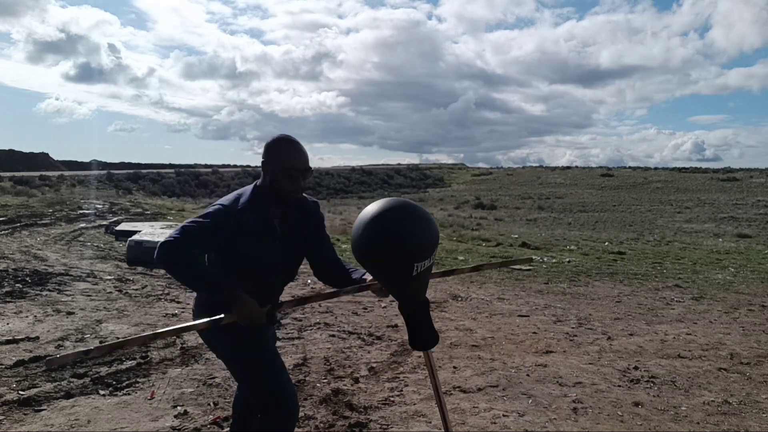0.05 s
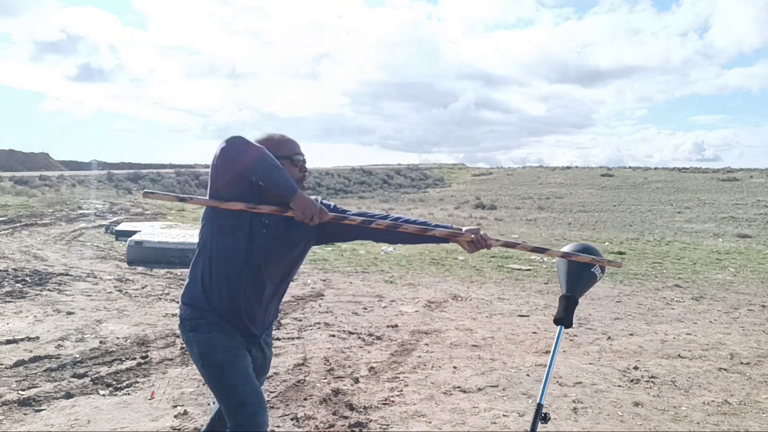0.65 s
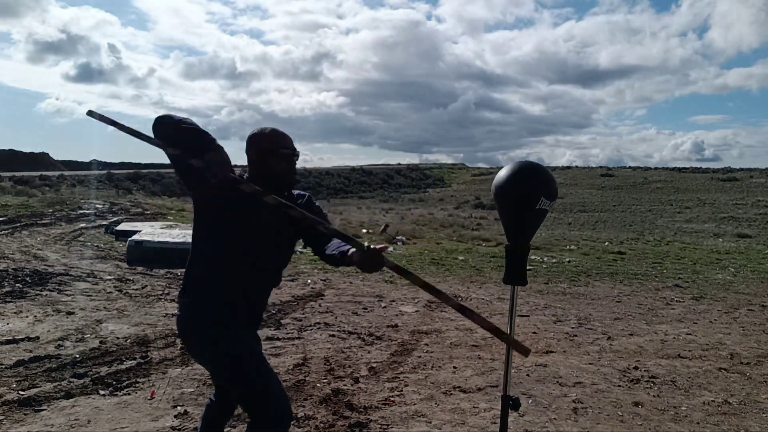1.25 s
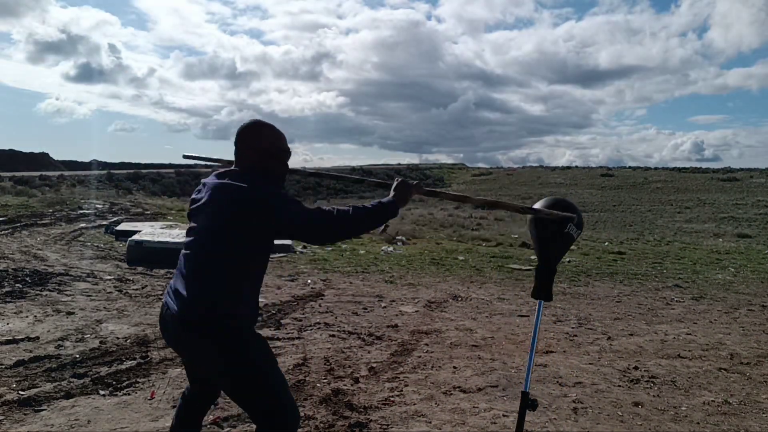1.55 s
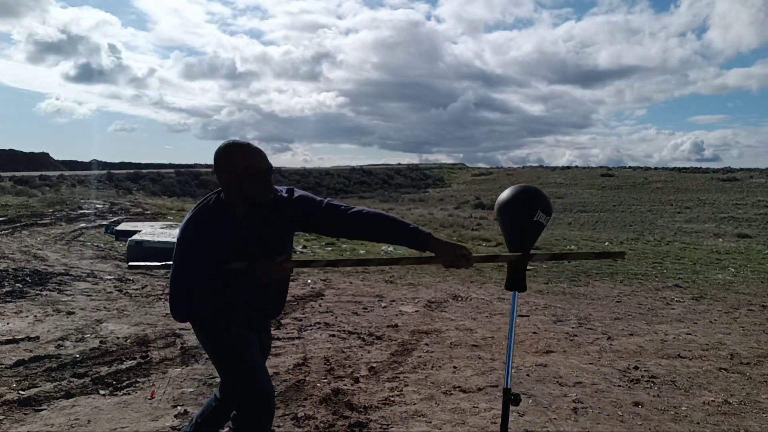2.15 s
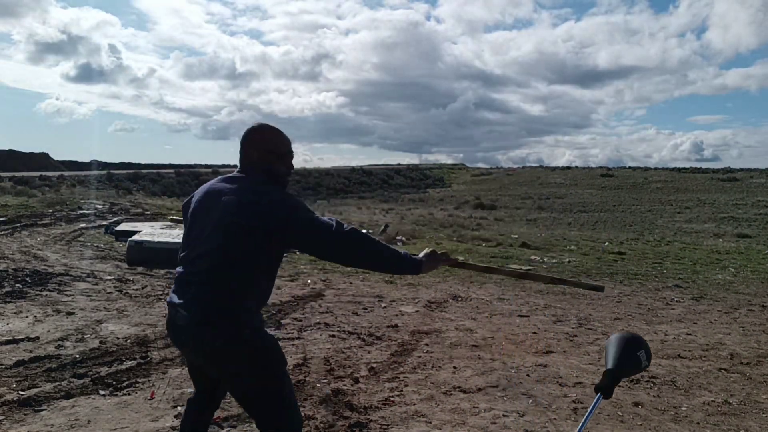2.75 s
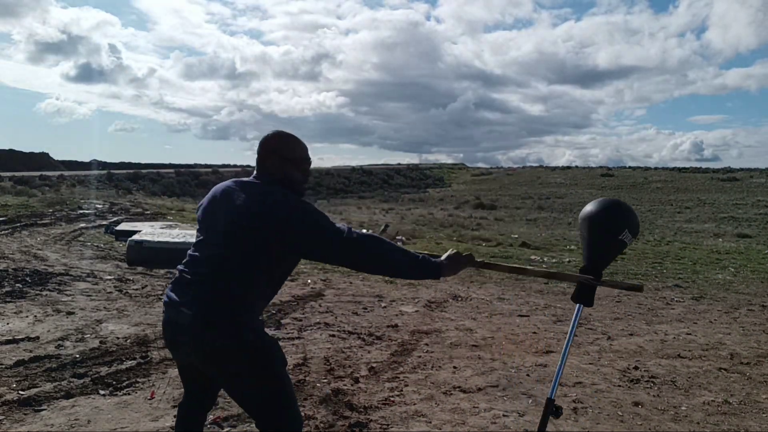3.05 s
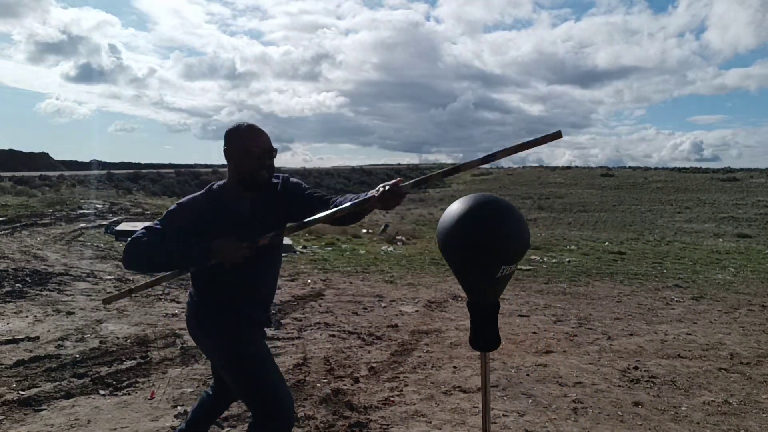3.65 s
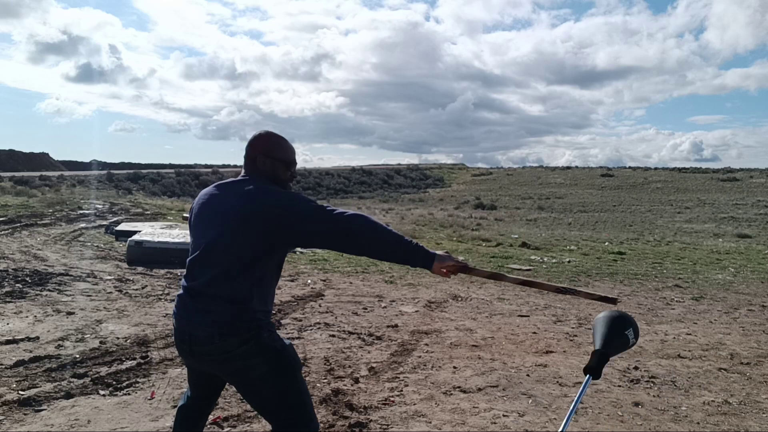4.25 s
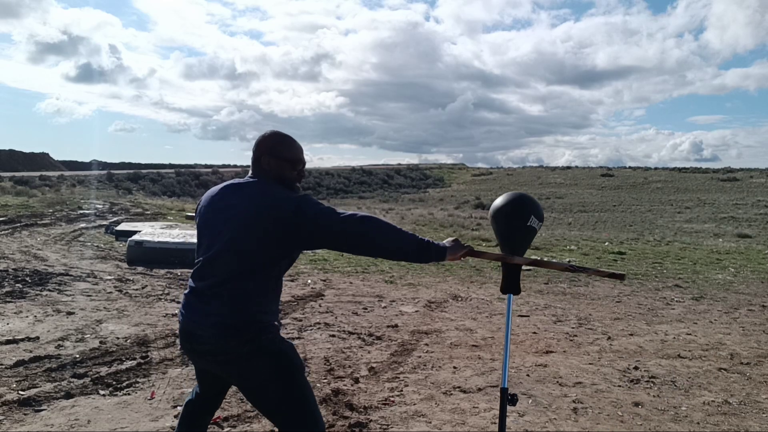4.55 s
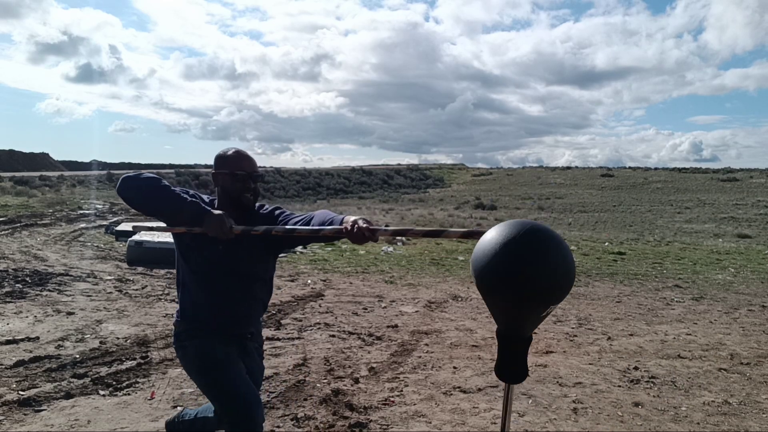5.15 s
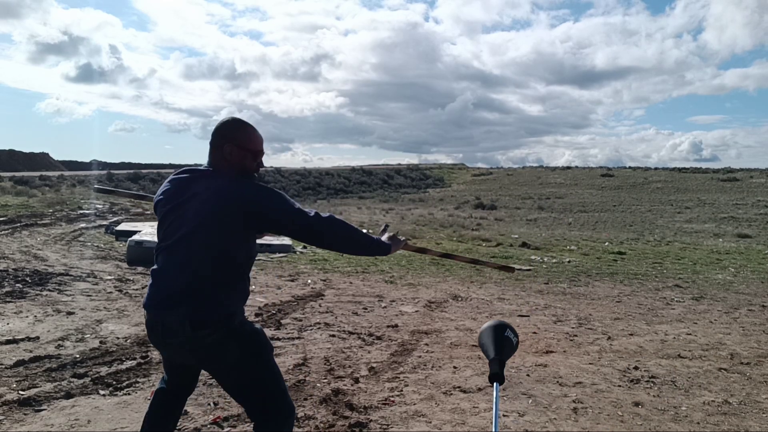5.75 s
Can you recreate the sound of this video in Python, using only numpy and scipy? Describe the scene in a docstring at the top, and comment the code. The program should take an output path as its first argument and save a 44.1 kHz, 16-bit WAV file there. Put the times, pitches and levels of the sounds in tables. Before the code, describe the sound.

Wind buffets the microphone in an open field as someone strikes a free-standing punching ball with a wooden stick. Two hard cracks on the pole come near the start, among quick, irregular slaps that continue to the end. Each blow shakes the stand into a hollow rattle, and its spring sometimes creaks. Faint clothing swishes and scuffs on dirt fill the gaps, with almost no echo.

```python
"""A wooden stick strikes a punching ball on a sprung steel pole in an open field.
It slaps the ball or cracks on the pole; the stand rattles, booms and rings, and its spring creaks.
Sleeves swish and shoes scuff with each move, and wind buffets the two microphone ports."""
import sys
import numpy as np
from scipy import signal
from scipy.fft import rfft, irfft, next_fast_len
from scipy.io import wavfile
from scipy.ndimage import uniform_filter1d

SR = 44100
rng = np.random.default_rng(int(sys.argv[2]) if len(sys.argv) > 2 else 0)


def persist_wave(psi):
    """Save psi, clipped to +-1, as 16-bit WAV."""
    counts = np.round(np.clip(psi, -1, 1) * 32767).astype(np.int16)
    wavfile.write(sys.argv[1], SR, np.atleast_2d(counts).T)


N = 265041
SPAN = 16384  # samples per event
AGE_S, TIME_S = np.arange(SPAN) / SR, np.arange(N) / SR
USUAL_SLAP_DB, USUAL_RATTLE_DB = -28, -37

# stick on ball: t/s, smack/dB, thump/dB
SLAP_HITS = [(.611, -31.5, -28), (1.422, -32.5, -44.5), (1.8446, -26.5, -30.5), (2.421, -26.5, -28),
             (2.935, -37, -29.5), (3.3308, -24.5, -22.5), (3.7768, -26.5, -19), (4.8566, -23.5, -28),
             (5.5589, -26, -23), (5.9823, -31.5, -32.5)]
# stand joints: t/s, chatter/dB, rise/s, t60/s, tilt/(dB/oct), boom/dB, boom f/Hz
STAND_JOLTS = [(.611, -45.5, 0.021, 0.094, 2, -36.5, 218.5),
               (0.6948, -39.5, 0.00064, 0.099, 0.5, -36.5, 310),
               (0.787, -42.5, 0.0017, 0.14, 4.5, -42, 295), (1.254, -48, 0.0022, 0.41, -9, -43, 262),
               (1.418, -35, 0.029, 0.19, 2.5, -27, 272.2), (1.4979, -36, 0.0013, 0.073, 4, -37, 238),
               (1.724, -50, 0.0017, 0.027, -11, -50.5, 544), (1.848, -44.5, 0.0027, 0.091, 8, -48, 211),
               (2.004, -40.5, 0.0032, .16, 3, -37, 355.4), (2.422, -27.5, 0.013, .16, 4, -20.5, 245.1),
               (2.92, -41, 0.013, 0.084, 4.5, -32.5, 343.7), (3.321, -34.5, 0.013, 0.17, 3.5, -25, 264.3),
               (3.78, -28, 0.002, 0.11, 5, -32.5, 253), (3.868, -43, 0.0049, 0.13, 3.5, -57, 250),
               (4.367, -26, 0.012, .062, 5, -28.5, 269.2), (4.473, -43, 0.0039, 0.11, 1.5, -41, 328),
               (4.858, -34.5, 0.0096, 0.13, 3.5, -35, 261.8), (5.386, -53, 0.0025, 0.017, 6, -52, 914),
               (5.565, -34, 0.0021, 0.021, 5, -55, 393), (5.986, -37, 0.0014, 0.064, 3, -66, 264)]
# scuff and grit spectrum: f/Hz, level/dB
SCUFF_SPECTRUM = [(150, 15), (450, 3.5), (1200, -1.5), (2500, -3.5), (4200, -4.5), (6200, 0), (8000, -6.5),
                  (10300, -2.5), (12500, -14.5), (16000, -24.5)]


def ball_slaps():
    """The skin smacks; the dented ball gives one heavily damped push of air."""
    # smack spectrum: f/Hz, level/dB
    spectrum = [(150, 10.5), (600, 12), (1300, -2), (2500, -5), (4300, 0), (6000, -4), (10000, 0),
                (12500, -6), (16000, -21)]
    out = np.zeros((2, N))
    push = -np.sin(2 * np.pi * 235 * AGE_S) * envelope(0.0012, 0.0088)
    push -= 0.47 * np.sin(2 * np.pi * 260 * AGE_S) * envelope(0.00424, 0.0068)
    for t_s, smack_db, thump_db in SLAP_HITS:
        smack = burst(spectrum, tilt_db_oct=-0.8, rise_s=0.00071, t60_s=0.0217, grain_db=5)
        add(out, t_s, amp(smack_db) * smack + amp(thump_db) * push)
    return out


def stick_cracks():
    """Wood on steel: a hard crack and a duller bounce; the stick's bending modes ring on."""
    # stick on pole: t/s, crack/dB, wood ring/dB, bounce delay/s, bounce/dB
    hits = [(0.1439, -21, -29, .016, -29.5), (1.2485, -25, -46.5, 0.0038, -35)]
    # stick modes: f/Hz, level/dB, t60/s
    modes = [(640, -17, 0.43), (987, -13, 0.23), (1065, 9, 0.015), (1250, -11, 0.12), (1681, -1.5, 0.077),
             (1778, 1.5, 0.028), (1920, -3, 0.12), (2147, -12, 0.11), (2240, -11, 0.067),
             (2730, -10, 0.014), (2600, -15.5, 0.099), (2930, -7.5, 0.048), (3900, -14.5, 0.057)]
    # crack spectrum: f/Hz, level/dB
    spectrum = [(150, 6.5), (400, 1), (700, 2), (1100, 7), (2600, 8.5), (4200, 0), (5500, 1), (8000, -0.5),
                (11000, -3), (16000, -21.5)]
    out = np.zeros((2, N))
    for t_s, crack_db, wood_db, bounce_s, bounce_db in hits:
        phases = rng.uniform(0, 2 * np.pi, (len(modes), 1, 1))
        phases = phases + 0.7 * rng.standard_normal((len(modes), 2, 1))  # spread between ports
        wood = sum(amp(db) * np.sin(2 * np.pi * hz * AGE_S + phase) * envelope(0.0015, t60_s)
                   for (hz, db, t60_s), phase in zip(modes, phases))
        crack = burst(spectrum, tilt_db_oct=0, rise_s=0.0004, t60_s=0.056, grain_db=4)
        bounce = burst(spectrum, tilt_db_oct=-2, rise_s=0.002, t60_s=0.11, grain_db=2)
        add(out, t_s, amp(crack_db) * crack + amp(wood_db) * wood)
        add(out, t_s + bounce_s, amp(bounce_db) * bounce)
    return out


def stand_rattles():
    """Loose joints chatter in clumps; the hollow stand booms just behind, with one overtone."""
    # chatter spectrum: f/Hz, level/dB
    spectrum = [(120, 2), (300, -4), (560, 23.5), (780, 6), (1200, 11.5), (1700, -2), (3000, -5),
                (4500, -13), (6000, -10), (8000, -17), (10300, -14.5), (12500, -31), (16000, -33.5)]
    out = np.zeros((2, N))
    for t_s, chatter_db, rise_s, t60_s, tilt_db_oct, boom_db, boom_hz in STAND_JOLTS:
        jolts = 0.2 * wander(SPAN, 120)  # chatter jolts the boom's pitch
        phase = 2 * np.pi * np.cumsum(boom_hz * (1 + jolts)) / SR
        boom_rise_s = 0.0036 + 1.7 * rise_s
        boom = np.sin(phase) * envelope(boom_rise_s, t60_s + 0.05)
        boom += amp(-10) * np.sin(1.9 * phase) * envelope(boom_rise_s, 0.16)
        chatter = burst(spectrum, tilt_db_oct, rise_s, t60_s, grain_db=4, bend=1.005)
        chatter *= amp(2 * np.clip(wander(SPAN, 110), -2, 2))
        boom *= flicker(depth_db=2, rate_hz=120)
        add(out, t_s, amp(chatter_db) * chatter + amp(boom_db) * boom)
    return out


def pole_rings():
    """A thin steel note; a close mode pair makes it beat, shaking joints roughen it."""
    # pole notes: t/s, f/Hz, level/dB, hold/s
    notes = [(0.196, 5320, -50.5, .14), (0.769, 6930, -66, 0.012), (1.252, 6960, -48.5, 0.02),
             (1.259, 5360, -75.5, .15), (2.486, 5220, -68.5, 0.026), (2.941, 5390, -72.5, 0.07),
             (3.797, 5330, -59.5, 0.023), (4.404, 5420, -62.5, 0.017), (5.185, 5760, -69, .005)]
    rise_s, t60_s, beat_hz, rough_hz = 0.011, 0.16, 11.5, 70
    out = np.zeros((2, N))
    for t_s, hz, db, hold_s in notes:
        phase = 2 * np.pi * hz * AGE_S + 0.25 * wander(SPAN, rough_hz)
        note = np.sin(phase) - 0.44 * np.sin(phase + 2 * np.pi * beat_hz * AGE_S)
        decay = amp(-60 * np.maximum(AGE_S - rise_s - hold_s, 0) / t60_s)
        shape = np.minimum(AGE_S / rise_s, 1) * decay
        add(out, t_s, amp(db) * note * shape * flicker(depth_db=1.5, rate_hz=rough_hz))
    return out


def spring_creaks():
    """Rubbing coils excite narrow resonances: loud in a deep bend, faint after each rattle."""
    # deep bends: t/s, level/dB, rise/s, t60/s, tilt/(dB/oct)
    creaks = [(2.853, -42, 0.0037, 0.12, 2), (3.97, -50.5, .1, 0.19, -1.5), (4.284, -41.5, 0.0095, 0.11, 2)]
    # spring resonances: f/Hz, width/Hz, level/dB
    modes = [(306.4, 45, 4.5), (512, 120, -1), (825, 7.8, -2), (1132, 30, -1.5), (1380, 33, -5),
             (1710, 13, -14), (2084, 150, -13.5)]
    out, hz = np.zeros((2, N)), bins(SPAN)
    power = sum(amp(db) ** 2 / (1 + (2 * (hz - mode_hz) / width_hz) ** 2)
                for mode_hz, width_hz, db in modes)
    modes_db = 1.21 * 10 * np.log10(power)  # factor deepens the valleys
    shakes = [(t_s, -63 + 0.93 * (db - USUAL_RATTLE_DB), 0.015, 0.39, 0) for t_s, db, *_ in STAND_JOLTS]
    for t_s, db, rise_s, t60_s, tilt_db_oct in creaks + shakes:
        tone_db = modes_db + tilt_db_oct * np.log2(np.maximum(hz / 1300, 1))
        rub = noise(SPAN, tone_db, grain_db=5, ripple_db=-1)
        add(out, t_s, amp(db) * rub * envelope(rise_s, t60_s, bend=1.52))
    return out


def scuffs():
    """Shoes on dirt, hands on the stick: short rubs that catch and slip."""
    # rubs: t/s, level/dB, t60/s
    rubs = [(0.0445, -52, 0.071), (0.0848, -43, 0.13), (0.2668, -47, 0.041), (.3395, -61.5, .027),
            (0.5029, -56, 0.2), (0.6457, -46.5, 0.047), (0.8029, -39, 0.061), (.9667, -57.5, 0.11),
            (1.7578, -58, 0.13), (2.188, -41, 0.15), (4.283, -47, 0.087), (4.7609, -42, 0.034),
            (4.9249, -41.5, 0.026), (5.0873, -52, .044), (5.192, -42, 0.044), (5.2946, -42, 0.11),
            (5.3516, -48, 0.051), (5.46, -49.5, 0.046), (5.9504, -54.5, 0.045)]
    out = np.zeros((2, N))
    for t_s, db, t60_s in rubs:
        rub = burst(SCUFF_SPECTRUM, tilt_db_oct=0, rise_s=0.0015, t60_s=t60_s, grain_db=-3)
        add(out, t_s, amp(db) * rub * flicker(depth_db=2.3, rate_hz=68))
    return out


def swishes():
    """Sleeves swell and fade with each stroke; the stick rushes into each slap."""
    # arm strokes: centre t/s, level/dB, half length/s, tilt/(dB/oct)
    strokes = [(0.077, -65, 0.046, 0), (0.224, -56.5, 0.048, -1.5), (0.546, -74.5, 0.09, 6),
               (0.917, -67, 0.11, -2), (1.211, -66.5, 0.021, 1), (1.365, -62, 0.057, 1),
               (1.648, -76.5, 0.07, 0.5), (1.798, -55.5, 0.038, -2), (1.973, -57.5, 0.043, -3),
               (2.246, -72, 0.15, -4), (3.174, -60, 0.045, -1), (3.35, -58, 0.074, -3),
               (3.587, -69.5, 0.066, 0), (3.882, -66, 0.12, 4), (4.511, -64.5, 0.023, -0.5),
               (4.753, -54.5, 0.052, -1), (4.842, -45, 0.014, -2), (4.961, -55, 0.03, -0.5),
               (5.11, -66, 0.1, -2), (5.413, -63.5, 0.082, 4), (5.631, -55.5, 0.036, 0.5),
               (5.736, -61, 0.043, -0.5)]
    rushes = [(t_s - 0.008, -62.5 + 0.9 * (db - USUAL_SLAP_DB), 0.023, 0) for t_s, db, _ in SLAP_HITS]
    out, grit_gain = np.zeros((2, N)), np.zeros((1, N))
    offset_s = AGE_S - AGE_S[-1] / 2
    for t_s, db, half_s, tilt_db_oct in strokes + rushes:
        swell = amp(db) * np.exp(-abs(offset_s / half_s) ** 2.3 / 2) * signal.windows.tukey(SPAN, 0.2)
        add(out, t_s + offset_s[0], swell * cloth(tilt_db_oct))
        add(grit_gain, t_s + offset_s[0], swell * amp(-9.5 + 2 * tilt_db_oct))
    return out + grit_gain * grit(ticks_per_s=70)


def cloth(tilt_db_oct):
    """Sliding cloth that catches as it goes."""
    # swish spectrum: f/Hz, level/dB
    spectrum = [(150, -6.5), (400, 13.5), (800, 11.5), (1400, 14.5), (2300, 8), (3500, 1.5), (5500, 1),
                (8000, -14), (10500, 1.5), (12500, -19.5), (16000, -19.5)]
    slide = noise(SPAN, tilted(spectrum, tilt_db_oct), grain_db=2, ripple_db=3.5)
    return folds(slide, depth_db=4) * flicker(depth_db=3.5, rate_hz=45)


def folds(x, depth_db):
    """Shifting folds: louder and softer patches, a few hundred Hz by some tens of ms."""
    frames = signal.stft(x, nperseg=1024, noverlap=768)[2]
    patches = uniform_filter1d(rng.standard_normal(frames.shape[1:]), size=6, axis=0)
    patches = unit_rms(uniform_filter1d(patches, size=14, axis=1))
    coloured = signal.istft(frames * amp(depth_db * patches), nperseg=1024, noverlap=768)[1]
    return unit_rms(coloured[:, :x.shape[1]])


def grit(ticks_per_s):
    """Sparse, uneven ticks of sand and seams."""
    onsets = rng.random(N) < ticks_per_s / SR
    impulses = onsets * amp(5 * np.minimum(rng.exponential(1, N), 2.5))
    tick = burst(SCUFF_SPECTRUM, tilt_db_oct=0, rise_s=0.00032, t60_s=0.036, grain_db=9.5)
    return signal.fftconvolve(impulses[None], tick, axes=1)[:, :N]


def wind():
    """Lumpy turbulence, unrelated at each port, plus a puff of pushed air after each slap."""
    # strength at left port: t/s, level/dB
    left = [(0.0, -30.5), (0.16, -41.5), (0.98, -33.5), (1.24, -67), (1.56, -39.5), (2.04, -63),
            (2.76, -38), (2.82, -51), (3.46, -40), (3.56, -71), (3.82, -60), (3.92, -60), (4.18, -80),
            (4.34, -24.5), (4.8, -67), (4.86, -45), (5.12, -62), (5.26, -43), (5.92, -70.5), (6.0, -60.5)]
    # strength at right port: t/s, level/dB
    right = [(0.0, -47), (0.04, -47), (1.099, -55.5), (1.181, -34.5), (1.26, -85), (1.48, -36.5),
             (1.62, -77), (1.939, -52.5), (2.32, -68), (2.52, -35), (3.261, -56), (3.462, -28.5),
             (3.741, -71), (3.861, -35.5), (4.221, -65.5), (5.14, -37), (5.441, -53), (5.6, -38.5),
             (5.9, -75.5), (6.0, -77)]
    # turbulence spectrum: f/Hz, level/dB
    spectrum = [(12, -28), (25, -7.5), (55, 1.5), (100, 0), (160, -9.5), (250, -23), (400, -47), (800, -63),
                (3000, -90)]
    gusty_db, gusty_hz, puff_lag_s, puff_s = 5, 7.8, 0.032, 0.021
    breeze_db = np.array([np.interp(TIME_S, *np.transpose(port)) for port in (left, right)])
    breeze_db += gusty_db * np.minimum([wander(N, gusty_hz), wander(N, gusty_hz)], 1)
    puffs = np.zeros(N)
    for t_s, _, thump_db in SLAP_HITS:
        shape = np.exp(-np.minimum(((TIME_S - t_s - puff_lag_s) / puff_s) ** 2, 20))
        puffs += amp(-39.5 + 0.51 * (thump_db - USUAL_SLAP_DB)) * shape
    gust_db = 10 * np.log10(amp(breeze_db) ** 2 + puffs ** 2)
    lumps = rng.standard_normal((2, N)) * amp(3.5 * np.clip([wander(N, 45), wander(N, 45)], -1.5, 1.5))
    rumble = unit_rms(irfft(rfft(lumps) * amp(curve(spectrum, bins(N))), N))
    # pressure ~ speed squared: strong crests sharpen into thuds
    highpass = signal.butter(2, 130, "high", fs=SR, output="sos")
    crests = signal.sosfilt(highpass, rumble * 3 * np.tanh(abs(rumble) / 3))
    return amp(gust_db) * rumble + amp(1.734 * gust_db + 14.5) * crests


def eddies():
    """Single eddies hit one port: a pressure peak between two shallow troughs."""
    # eddy hits: t/s, level/dB, f/Hz, port (0 left, 1 right)
    hits = [(0.057, -22, 105, 0), (.38, -31.5, 177, 0), (0.512, -31, 320, 0), (0.57, -29, 200, 0),
            (0.759, -21, 133, 0), (.89, -22, 93, 0), (0.934, -24, 104, 0), (0.997, -20, 120.4, 0),
            (1.573, -22, 136, 0), (2.617, -30, 168, 1), (2.7, -23.5, 151.7, 0), (4.337, -19.5, 113, 0),
            (4.342, -21.5, 202, 0), (4.919, -24, 190, 1), (5.008, -31.5, 239, 1), (5.102, -31, 174, 1),
            (5.118, -32.5, 163, 1), (5.266, -19.5, 117.4, 0), (5.471, -27, 141, 0)]
    out = np.zeros((2, N))
    for t_s, db, hz, port in hits:
        u = np.pi * hz * (TIME_S - t_s)
        out[port] += amp(db) * (1 - 2 * u ** 2) * np.exp(-np.minimum(u ** 2, 50))
    return out


def ground_scatter(x):
    """Rough ground returns a thin, short tail that loses treble first."""
    taps = rng.standard_normal((2, SPAN)) * (rng.random((2, SPAN)) < 3000 / SR)
    taps *= np.clip(AGE_S / 0.0043, 0, 1)
    low = signal.sosfilt(signal.butter(2, 2500, fs=SR, output="sos"), taps)
    tail = low * amp(-60 * AGE_S / 0.27) + 0.35 * (taps - low) * amp(-60 * AGE_S / 0.17)
    return signal.fftconvolve(x, unit_rms(tail) / np.sqrt(SPAN), axes=1)[:, :N]


def field_hiss():
    """Faint pink hiss of the field."""
    size = next_fast_len(N)
    return amp(-88.5) * noise(size, -3 * np.log2(bins(size) + 100), grain_db=1.5, ripple_db=0.5)[:, :N]


def ports(x, lag_samples=45):
    """The left port faces away: sound arrives later, treble shaded."""
    # port shading: f/Hz, left minus right/dB
    shade = [(100, 7), (350, 3), (700, 2.5), (1150, 10.5), (2300, 1), (4400, -2), (6000, -10.5),
             (8200, -4.5), (10000, -34.5), (16000, -31.5)]
    ratio = amp(curve(shade, bins(N)))
    gains = np.array([ratio, np.ones_like(ratio)]) * np.sqrt(2 / (1 + ratio ** 2))
    left, right = irfft(rfft(x) * gains, N)
    return np.array([np.pad(left, (lag_samples, 0))[:N], right])


def burst(spectrum, tilt_db_oct, rise_s, t60_s, grain_db, bend=1):
    """A dying crowd of tiny contacts, with the rms of its envelope."""
    shape = envelope(rise_s, t60_s, bend)
    crowd = noise(SPAN, tilted(spectrum, tilt_db_oct), grain_db)
    return unit_rms(crowd * shape) * np.sqrt(np.mean(shape ** 2))


def noise(size, tone_db, grain_db, ripple_db=3):
    """Grainy coloured noise with small random resonances, partly alike at both ports."""
    # port likeness: f/Hz, correlation
    likeness = [(100, 1), (600, 0.77), (1500, 0.14), (4000, 0.12), (16000, 0.13)]
    grains = rng.standard_normal((2, size)) * amp(grain_db * np.clip(wander(size, 1200), -2, 2))
    common, separate = rfft(grains)
    hz = bins(size)
    ripple = np.interp(hz, np.arange(200) * 120, rng.standard_normal(200)) * np.clip(hz / 1500, 0, 1)
    alike = np.clip(curve(likeness, hz), 0, 1)
    left = alike * common + np.sqrt(1 - alike ** 2) * separate
    return unit_rms(irfft(np.array([left, common]) * amp(tone_db + ripple_db * ripple), size))


def envelope(rise_s, t60_s, bend=1):
    """Linear rise, then decay; bend > 1 holds on, then stops short."""
    return np.minimum(AGE_S / rise_s, 1) * amp(-60 * (np.maximum(AGE_S - rise_s, 0) / t60_s) ** bend)


def flicker(depth_db, rate_hz):
    """Random gain over one event."""
    return amp(depth_db * wander(SPAN, rate_hz))


def wander(size, rate_hz):
    """Smooth random curve, rms 1."""
    count = next_fast_len(int(min(size, size * rate_hz * 12 / SR)) + 16)
    hz = np.arange(count // 2 + 1) * SR / size
    draw = rng.standard_normal((size // 16, 2))[:len(hz)] @ [1, 1j]
    coarse = irfft(draw * np.exp(-(hz[:len(draw)] / rate_hz) ** 2), count)
    return unit_rms(np.interp(np.arange(size) * count / size, np.arange(count), coarse))


def tilted(spectrum, tilt_db_oct):
    """Level/dB per bin, tilted about 2 kHz."""
    hz = bins(SPAN)
    return curve(spectrum, hz) + tilt_db_oct * np.log2(np.maximum(hz, 400) / 2000)


def curve(points, hz):
    """Table lookup on a log-frequency axis."""
    points_hz, values = np.transpose(points)
    return np.interp(np.log(hz + 1), np.log(points_hz + 1), values)


def bins(size):
    """FFT bin frequencies/Hz."""
    return np.fft.rfftfreq(size, 1 / SR)


def amp(db):
    """dB to gain."""
    return 10 ** (np.asarray(db) / 20)


def unit_rms(x):
    """Scales to rms 1."""
    return x / np.sqrt(np.mean(x ** 2) + 1e-20)


def add(mix, t_s, sound):
    """Adds a sound at t_s, cut to the mix."""
    start = round(t_s * SR)
    sound = sound[..., max(-start, 0):]
    part = mix[:, max(start, 0):][:, :sound.shape[-1]]
    part += sound[..., :part.shape[1]]


def scene():
    """Blows, stand and cloth in the open field, wind on top."""
    blows = ball_slaps() + stick_cracks() + stand_rattles() + scuffs()
    arriving = blows + amp(-23) * ground_scatter(blows) + spring_creaks() + field_hiss() + swishes()
    return ports(arriving) + pole_rings() + wind() + eddies()


def record(dry):
    """Band limit at 16.3 kHz."""
    lowpass = signal.firwin(511, 16300, window=("kaiser", 9), fs=SR)
    return signal.oaconvolve(dry, lowpass[None], "same")


dry = scene()
out = record(dry)
persist_wave(out)
```